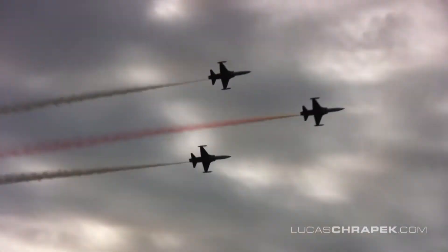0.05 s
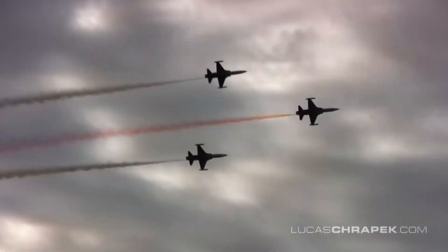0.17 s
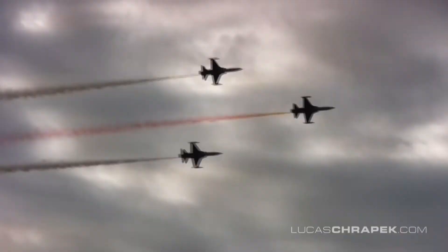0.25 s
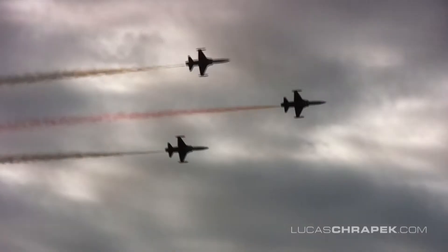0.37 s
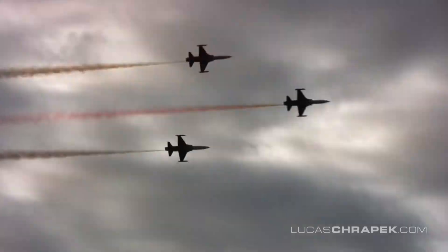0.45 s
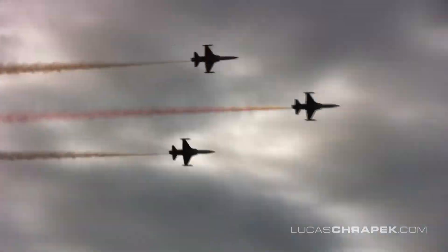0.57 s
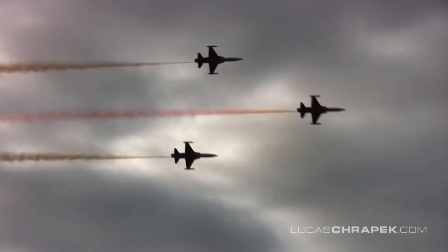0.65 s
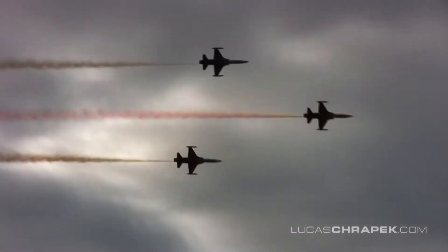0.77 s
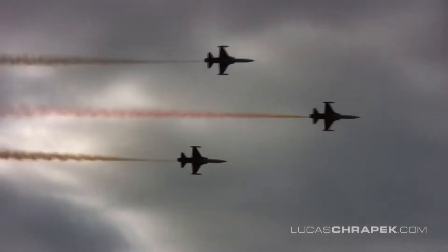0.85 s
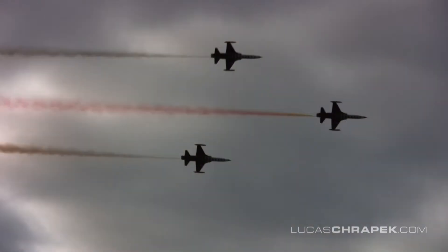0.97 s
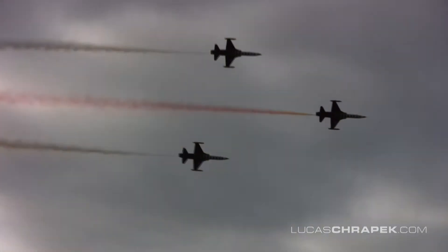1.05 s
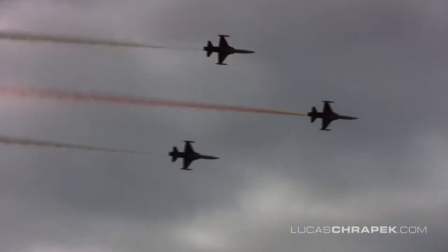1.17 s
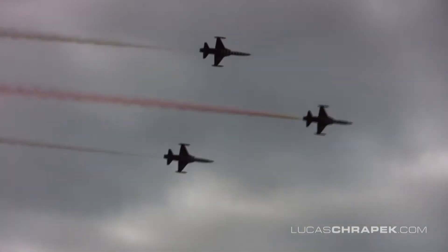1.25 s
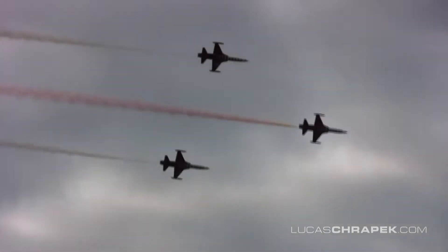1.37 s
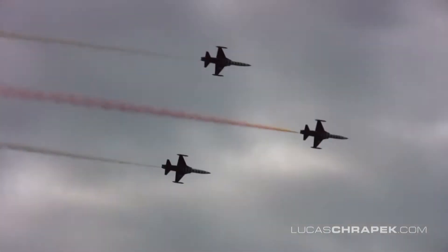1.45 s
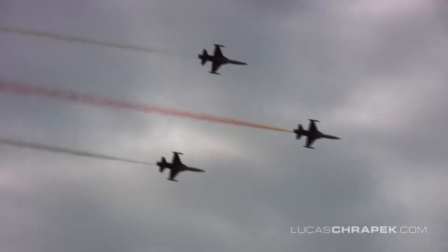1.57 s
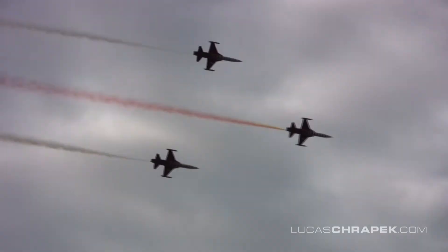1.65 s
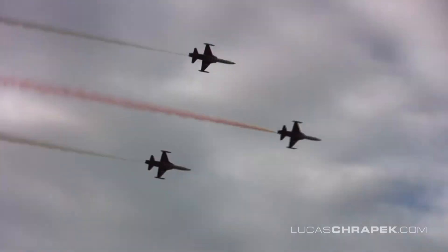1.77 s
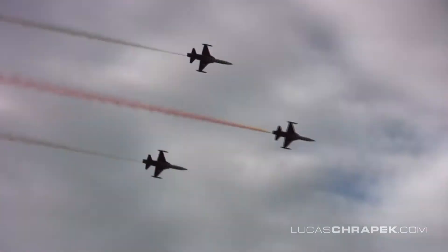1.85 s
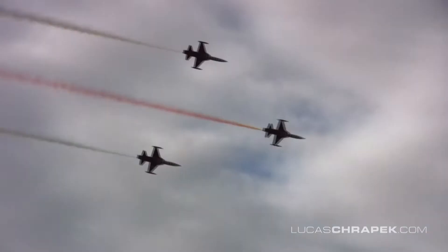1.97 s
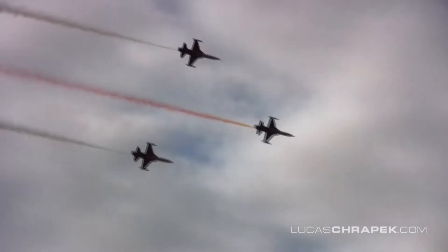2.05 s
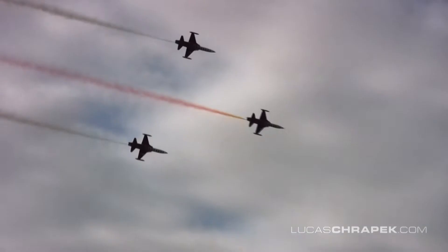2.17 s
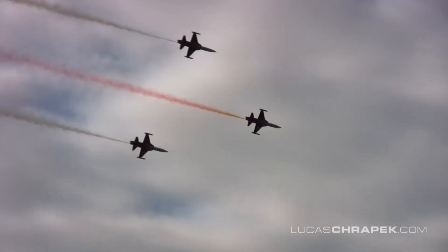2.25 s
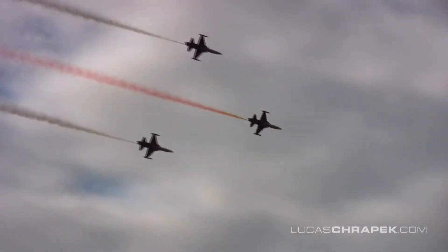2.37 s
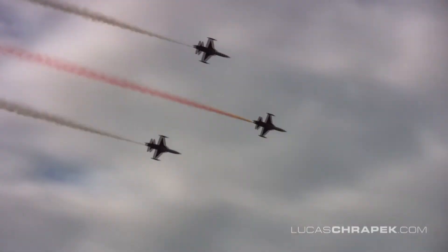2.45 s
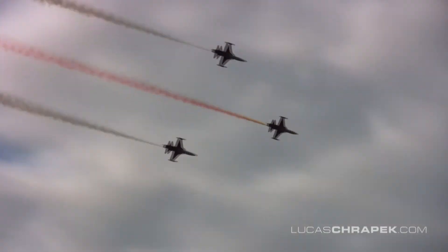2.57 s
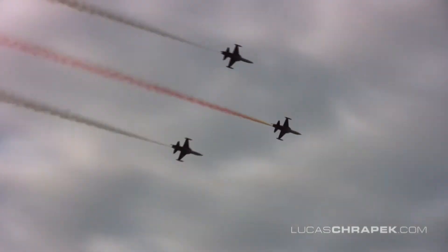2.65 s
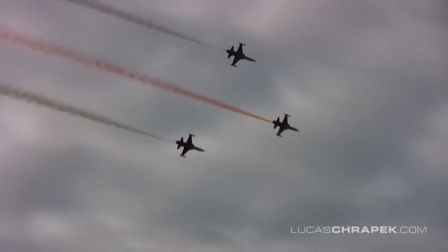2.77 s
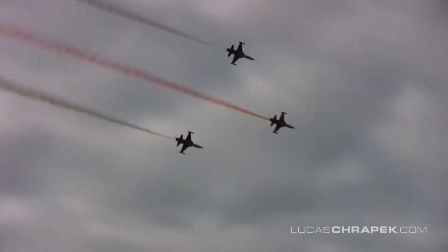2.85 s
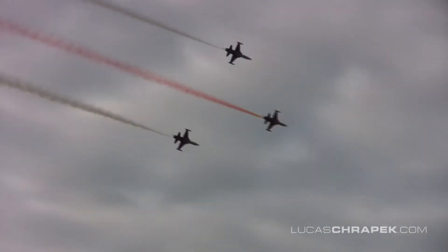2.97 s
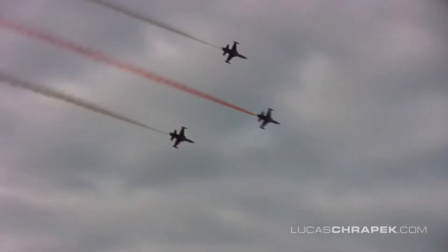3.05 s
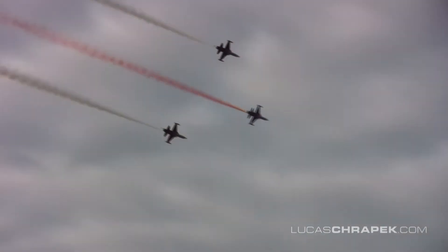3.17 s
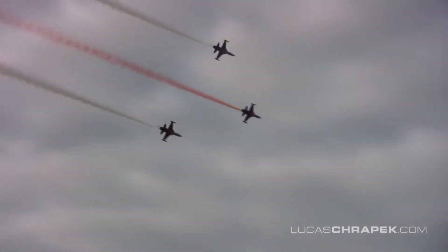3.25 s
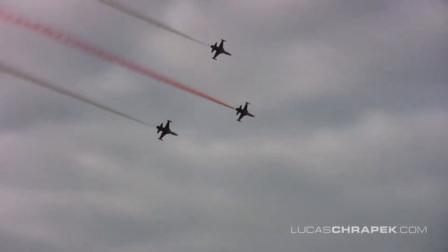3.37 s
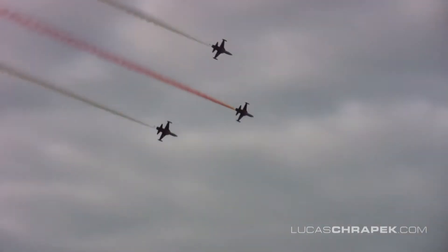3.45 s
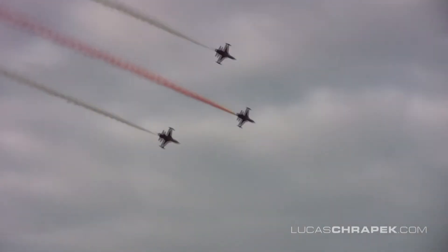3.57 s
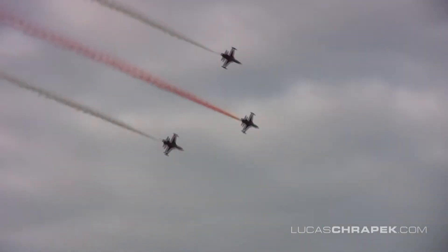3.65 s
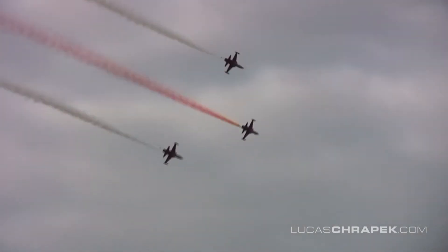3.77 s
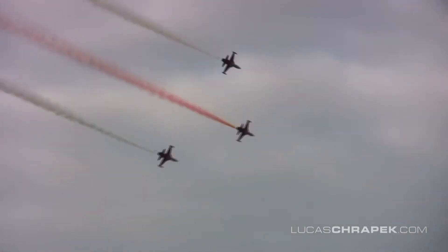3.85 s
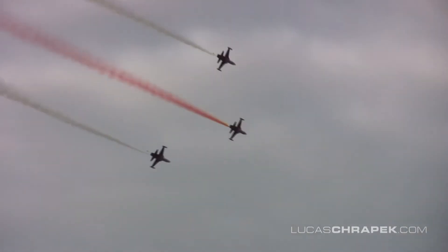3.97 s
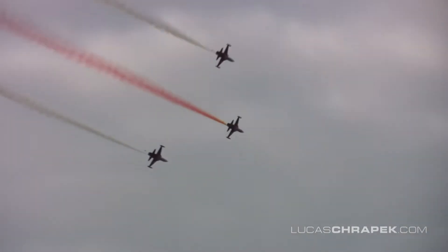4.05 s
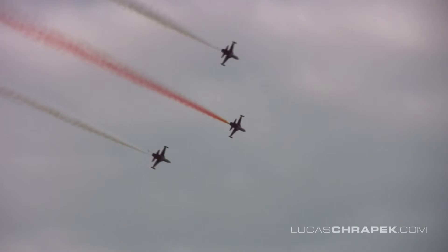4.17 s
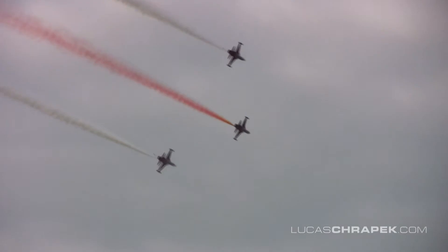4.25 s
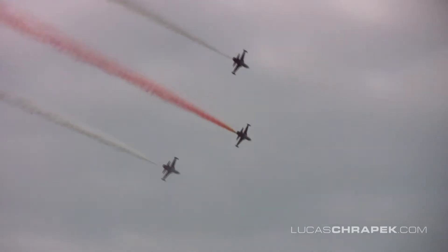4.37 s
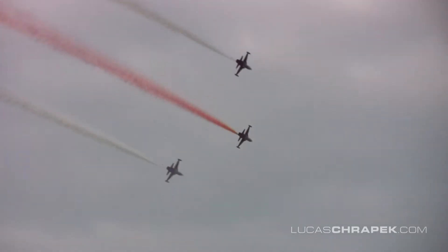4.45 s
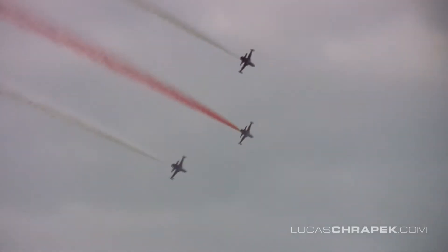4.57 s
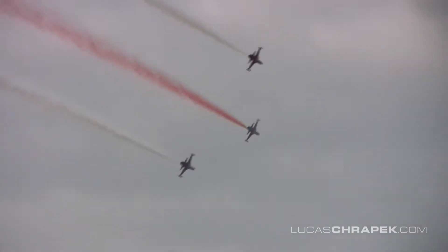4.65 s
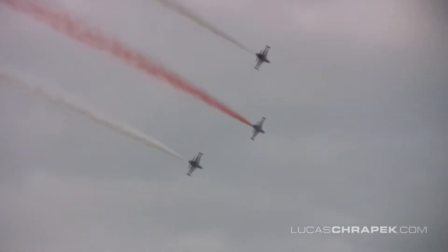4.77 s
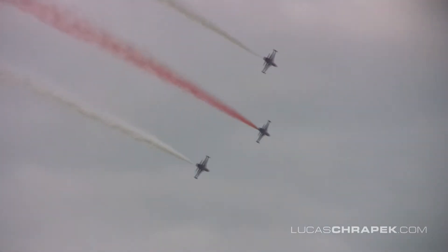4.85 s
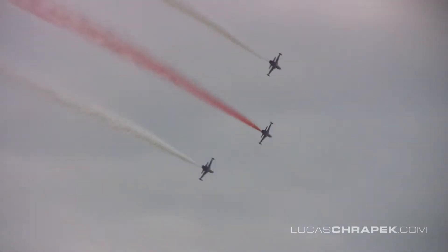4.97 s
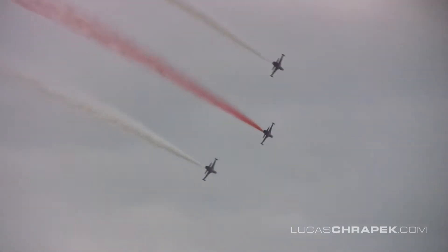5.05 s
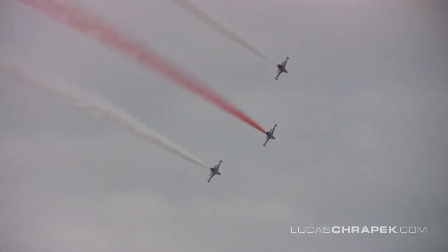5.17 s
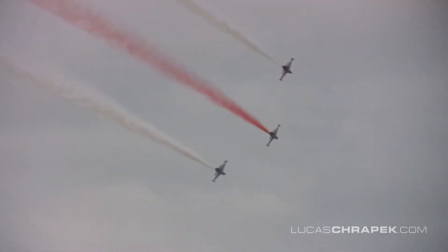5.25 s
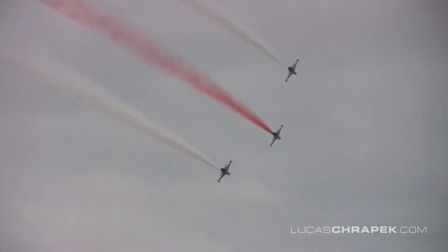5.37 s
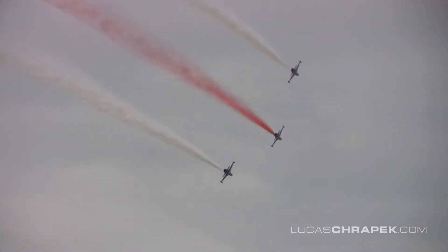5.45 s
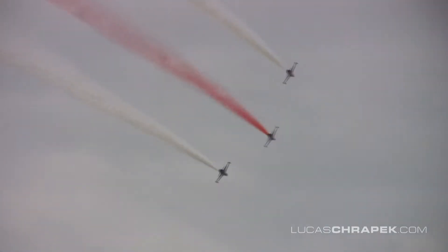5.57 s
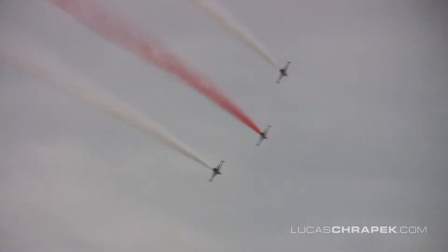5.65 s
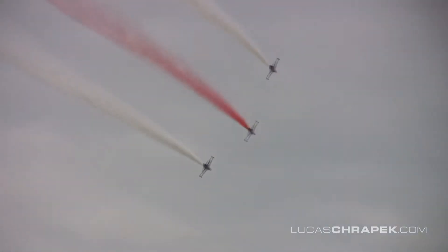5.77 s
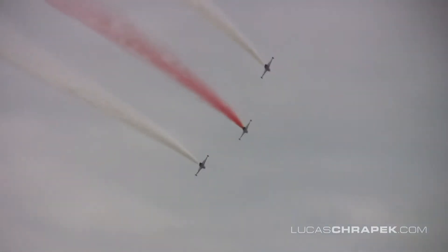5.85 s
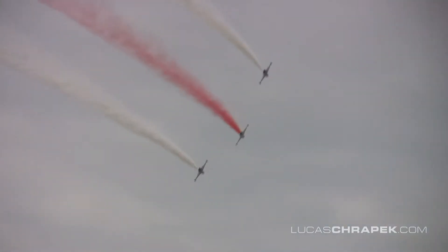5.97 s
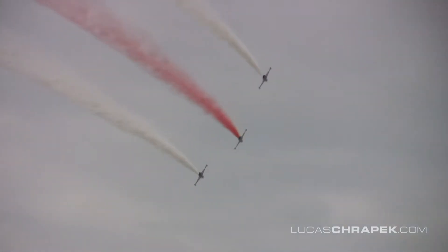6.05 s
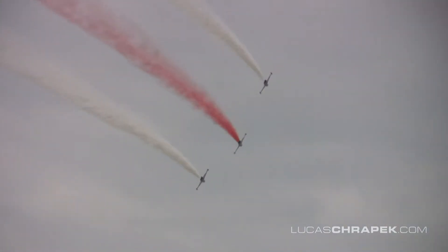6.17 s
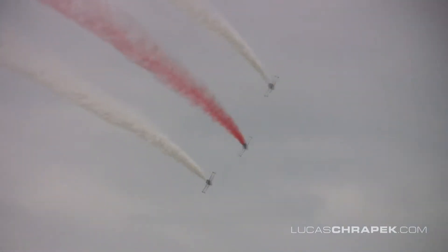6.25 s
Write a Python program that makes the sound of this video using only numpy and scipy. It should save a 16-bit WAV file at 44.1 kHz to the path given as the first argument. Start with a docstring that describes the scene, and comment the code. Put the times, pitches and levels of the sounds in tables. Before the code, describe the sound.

Open airfield, outdoor stereo microphone, three jets blending into one broad noise. At 0 s the exhaust is muffled and fairly quiet, with uneven surges around 0.3 and 0.55 s. By 1 s it brightens into a tearing rasp, with brief narrow whooshes sliding down in pitch. From 1.5 to 2.5 s it surges quickly and fine crackle builds, with tight spitting bursts, a sharp one near 1.8 s. A ground echo sweeps a hollow, phasing colour through it. Around 3 to 4.5 s the deep rear roar is fullest, rough and tearing, with a small lone crack at 3.9 s and a stronger one at 4.5 s. Low wind flutter begins near 2.4 s and continues lightly. After 4.5 s crackle and rasp thin out; the roar becomes darker and rumbly, fading in waves but still present at 6.3 s.

```python
"""Three jet fighters pass overhead in formation and climb away, heard from an open airfield.
Ahead of the nozzles the exhaust rasps; behind them it swells to a deep roar, and its shock fronts crackle.
Noise is coloured by flight path, narrow bands flare and slide down, and random fronts make the crackle.
A ground echo sweeps a comb through roar, rasp and crackle, turbulent air makes them surge,
and a breeze, built from low fluttering noise, catches the microphone."""
import sys
import numpy as np
from scipy import signal
from scipy.fft import rfft, irfft, next_fast_len
from scipy.io import wavfile
from scipy.ndimage import uniform_filter1d, map_coordinates

SR = 44100
rng = np.random.default_rng(int(sys.argv[2]) if len(sys.argv) > 2 else 0)


def waveform_to_disk(signal):
    """Save audio, clipped to [-1, 1], as 16-bit WAV at the path in sys.argv[1]."""
    frames = np.transpose(np.atleast_2d(signal))
    scaled = np.clip(frames, -1, 1) * 32767
    samples = np.round(scaled).astype(np.int16)
    wavfile.write(sys.argv[1], SR, samples)


N = 278182

# Flight path. Each row: time in seconds, middle ground-echo delay in ms, aft share 0-1,
# air loss in dB at 4 kHz, pitch factor.
FLIGHT_PATH = [(0, 2.22, 0.18, 25.5, 0.83), (.55, 2.4, 0.28, 9, 0.94), (.95, 2.28, 0.25, 2, 0.98),
               (1.5, 2.74, 0.39, 6, 1.028), (2.0, 3.5, 0.41, 3, 0.98), (2.5, 4.1, 0.47, 4, 1.082),
               (3.1, 4.03, 0.73, 3.5, 1.057), (4.0, 3.9, 0.87, 4.5, 1), (6.3, 3.1, 1, 6, 0.93)]
# Surges and lulls from moving air. Each row: centre in seconds, length in seconds,
# roar change in dB, rasp change in dB.
AIR_SURGES = [(0.15, 0.091, -5, 1), (0.341, 0.17, 4.5, 6.5), (0.565, 0.15, 6.5, 3.5),
              (0.725, 0.14, -1.5, -6.5), (0.814, 0.035, 0, 2), (0.97, 0.043, 1, -3.5),
              (1.04, 0.076, 2.3, 2.4), (1.237, 0.042, -1, -5), (1.302, 0.06, 1.9, 5),
              (1.381, 0.028, 1, 7.5), (1.474, 0.061, -1.5, 7), (1.579, 0.033, -5, 5.5),
              (1.814, 0.021, 7, 6.5), (1.857, 0.03, -0.5, -2.5), (2.073, 0.11, 4.5, 6),
              (2.161, 0.022, 3.5, 5.5), (2.231, 0.087, 4.5, 2.5), (2.333, 0.03, 4.5, 7),
              (2.406, 0.05, 2, 7), (2.475, 0.024, 1.5, -2), (2.5, 0.026, 0.5, 4.5), (2.633, 0.03, 2, 2.5),
              (2.682, 0.04, 2, 2.5), (2.899, 0.031, -3, 6), (3.02, 0.091, 1, 5), (3.133, 0.056, 0.5, 9.5),
              (3.222, 0.067, 2.5, 5), (3.367, 0.144, -3.5, -0.5), (3.585, 0.084, 0, 5),
              (3.74, 0.15, 2.5, 2), (3.83, 0.086, 2, 6.5), (3.975, 0.13, 3, 4), (4.185, 0.12, -0.5, 6),
              (4.352, 0.11, 3.5, 2.5), (4.456, 0.033, 4, 3), (4.521, 0.11, 4, 8.5), (4.661, 0.17, 0, 4.5),
              (4.742, 0.018, 1, -6.5), (4.94, 0.061, -2.5, -2.5), (5.058, 0.033, -1, 4.5),
              (5.151, 0.042, -1.8, 6), (5.256, 0.076, 0, 5), (5.339, 0.049, 6.5, 1), (5.408, 0.065, 6, 6),
              (5.65, 0.062, -0.5, -2.5), (5.78, 0.066, 5.5, 7.5), (6.098, 0.06, -2, 3.5)]
# Slow level of each noise. Each holds: level in dB before the slopes, rise end in seconds,
# fall start in seconds, rise in dB/s, fall in dB/s.
ROAR_SWELL = (-24, 4.5, 4, 5, 3)
RASP_SWELL = (-32, 2, 3, 6.5, 2.5)
CRACKLE_SWELL = (-60.5, 1.65, 3.5, 23.5, 6.5)
# Turbulent mixing from ahead and from behind. Each row: frequency in Hz, relative level in dB per Hz.
ROAR_AHEAD_SPECTRUM = [(20, -49), (55, -22), (105, -9), (190, -14.5), (270, -1.5), (380, 0), (650, -2),
                       (860, -6.5), (1300, -12.5), (4000, -74)]
ROAR_AFT_SPECTRUM = [(20, -53.5), (70, -22.5), (120, -20.5), (160, -2), (230, 0), (300, 4), (400, -3.5),
                     (560, -2), (700, -3), (950, -14.5), (1400, -15.5), (4000, -71)]
# Shock-cell noise from ahead and from behind. Each row: frequency in Hz, relative level in dB per Hz.
RASP_AHEAD_SPECTRUM = [(250, -41.5), (500, -17), (900, -9.5), (1250, -9.5), (1600, 3.5), (2050, 1),
                       (2400, -7), (2700, -20.5), (3100, -17.5), (3700, -13), (4300, -41), (5000, -33.5),
                       (8000, -76)]
RASP_AFT_SPECTRUM = [(250, -31.5), (450, -1), (850, 0.5), (1200, -3), (1600, -2), (1950, -5.5), (2350, -12),
                     (3050, -8), (3600, -22), (4050, -21), (4800, -29.5), (8000, -59.5)]
# Narrow bands that flare. Each row: centre in seconds, length in seconds, frequency in Hz at the centre,
# level in dB.
FLARES = [(.25, 0.93, 631, -47), (.38, 0.11, 1490, -46), (.52, .15, 409, -40.5), (0.545, 0.12, 1578, -38),
          (1.061, 0.073, 1265, -35), (1.13, 0.31, 370.8, -41.5), (1.5, 0.29, 350, -37.5),
          (1.796, 0.044, 1523, -33), (3.87, 0.36, 509.3, -28.5), (4.389, 0.087, 529, -26.5)]
# Trains of small fronts, then steep ones. Each row: frequency in Hz, relative level in dB per Hz.
CRACKLE_SPECTRUM = [(600, -26), (3300, 3.5), (4050, -5), (4650, -1), (7000, -10.5), (10000, -18.5),
                    (15500, -49.5)]
SNAP_SPECTRUM = [(400, -13.5), (1800, 14.5), (3500, 8.5), (5500, 4.5), (10000, -3), (12000, -11),
                 (15500, -17.5)]
# Tight clusters of steep shock fronts. Each row: centre in seconds, length in seconds, level in dB.
SHOCK_BURSTS = [(.83, .035, -70.5), (1.338, .025, -60), (1.385, .01, -55), (1.487, .025, -52.5),
                (1.814, 0.0071, -39), (1.936, 0.019, -49.5), (2.023, .015, -46.5), (2.037, 0.009, -40),
                (2.16, 0.027, -52.5), (2.224, 0.022, -48.5), (2.317, .01, -48.5), (2.397, .014, -46),
                (2.434, .018, -47), (2.62, 0.0098, -43), (2.681, .025, -54), (2.911, 0.013, -47.5),
                (2.967, 0.027, -49.5), (3.121, 0.03, -48), (3.156, 0.018, -47), (3.21, .02, -51.5),
                (3.262, 0.02, -48), (3.959, 0.016, -48.5), (4.086, 0.046, -53.5), (4.176, .012, -44.5),
                (4.47, .03, -53), (4.523, .025, -49.5), (4.8, .03, -62), (4.886, 0.046, -61.5),
                (5.492, .025, -64), (5.589, .06, -64.5), (5.788, 0.045, -62), (6.122, .025, -70)]
# Wind on the ports. Each row: frequency in Hz, relative level in dB per Hz.
BUFFET_SPECTRUM = [(20, -35.5), (55, -13.5), (85, 5.5), (155, 1), (300, -7), (3000, -71.5)]
# Gusts on the microphone. Each row: centre in seconds, length in seconds, level in dB.
WIND_GUSTS = [(2.427, 0.39, -39), (4.352, 0.45, -44.5), (4.836, 0.19, -41), (5.494, 0.16, -45.5)]
# Lone steepened fronts. Each row: time in seconds, pressure scale in dB before the left-right tilt,
# rise constant in microseconds.
LONE_CRACKS = [(3.862, -20.5, 27), (4.5222, -11.5, 52)]
# Left-right likeness of the jets. Each row: frequency in Hz, likeness from -1 to 1.
PORT_LIKENESS = [(300, 1), (2800, 0.98), (4200, 0.75)]

FLARE_WIDTH_HZ, FLARE_SINK_OCT_PER_S = 116, .5
CRACKLE_DB_PER_RASP_DB = 0.88
CRACK_RELAX_S = .0004
CALM_DB, BREEZE_DB, BREEZE_FROM_S = -70.5, -47, 2.8
TOP_HZ = 15700
FRAME, OVERLAP = 1024, 768  # samples
HZ = np.fft.rfftfreq(FRAME, 1 / SR)[:, None]
TIME_S = np.arange(N) / SR


def amp(db):
    """Decibels to amplitude."""
    return 10 ** (np.asarray(db) / 20)


def unit(x):
    """Scale to rms 1."""
    return x / np.sqrt(np.mean(x ** 2) + 1e-20)


def along(points, hz):
    """Interpolate (Hz, value) points on a log frequency axis."""
    point_hz, values = np.transpose(points)
    return np.interp(np.log(hz + 1), np.log(point_hz + 1), values)


def curves(rows, s=TIME_S):
    """Each column after the time, at times s or at every sample."""
    knots_s, *columns = np.transpose(rows)
    return [np.interp(s, knots_s, column) for column in columns]


def wobble(knots_per_s):
    """A smooth random curve."""
    knots = rng.standard_normal(int(N * knots_per_s / SR) + 4)
    return map_coordinates(knots, [TIME_S * knots_per_s])


def delayed(x, ms):
    """One channel, late by a changing time."""
    return map_coordinates(x, [np.arange(N) - ms * SR / 1000], order=3)


def hump(centre_s, length_s):
    """A bell, above half its height for the given length."""
    return .5 ** ((2 * (TIME_S - centre_s) / length_s) ** 2)


def passing(level_db, rise_end_s, fall_start_s, rise_db_per_s, fall_db_per_s):
    """Level in dB: one slope up until the rise ends, one down from the fall's start."""
    rise_db = rise_db_per_s * np.maximum(rise_end_s - TIME_S, 0)
    fall_db = fall_db_per_s * np.maximum(TIME_S - fall_start_s, 0)
    return level_db - rise_db - fall_db


def coloured(pair, colour, likeness, lo_hz, hi_hz, patchy_db):
    """Colour mid and side noise by colour(s) in dB, levelled over the band lo-hi, and make left and right."""
    _, s, z = signal.stft(pair, SR, nperseg=FRAME, noverlap=OVERLAP)
    gain = amp(colour(s))
    in_band = (HZ > lo_hz) & (HZ < hi_hz)
    gain = gain / np.sqrt(np.mean(gain ** 2 * in_band, axis=0))
    # random patches of level, smooth across frequency and time
    patches = uniform_filter1d(rng.standard_normal(z.shape[1:]), size=8, axis=0)
    patches = uniform_filter1d(patches, size=14, axis=1)
    # half-angle that splits power between mid and side
    turn = np.arccos(np.clip(likeness, -1, 1) * np.ones_like(HZ)) / 2
    z = z * gain * amp(patchy_db * unit(patches)) * np.array([np.cos(turn), np.sin(turn)])
    mid, side = signal.istft(z, SR, nperseg=FRAME, noverlap=OVERLAP)[1][:, :N]
    return np.array([mid + side, mid - side])


def radiated(ahead, behind, shifted=True):
    """The colour that reaches the ground: turned from nose to tail, pitch-shifted by motion, dulled by air."""
    def colour(s):
        _, aft, loss_db, pitch = curves(FLIGHT_PATH, s)
        hz = HZ / pitch if shifted else HZ
        source_db = (1 - aft) * along(ahead, hz) + aft * along(behind, hz)
        return source_db - np.maximum(loss_db, 0) * (HZ / 4000) ** 1.74
    return colour


def grounded(x, strength):
    """Direct sound plus ground echo; each jet has its own delay, which blurs the higher notches."""
    late_ms = curves(FLIGHT_PATH)[0]
    echoes = [[delayed(channel, late_ms * (1 + 0.079 * jet)) for channel in x] for jet in (-1, 0, 1)]
    echo = np.mean(echoes, axis=0)
    return np.std(x) * unit(x + strength * echo)


def fronts(per_s, spread_db):
    """Shock fronts at random moments and of uneven size, as mid and side."""
    struck = rng.random(N) < per_s / SR
    sizes = amp(spread_db * np.minimum(rng.standard_normal(N), 2.3))
    return unit(struck * sizes * np.array([np.ones(N), rng.standard_normal(N)]))


def surges():
    """Moving air focuses sound into surges or bends it away in lulls: dB added to roar and rasp."""
    return sum(np.outer([roar_db, rasp_db], hump(s, length_s))
               for s, length_s, roar_db, rasp_db in AIR_SURGES)


def roar(surge_db, flicker):
    """Large eddies mix in the plumes: the deep noise grows as the nozzles turn to the listener."""
    eddies = grounded(rng.standard_normal((2, N)), strength=0.52)
    mixing = radiated(ROAR_AHEAD_SPECTRUM, ROAR_AFT_SPECTRUM, shifted=False)

    def colour(s):
        # as the jets recede, the lowest rumble grows against the rest
        rumble_db = np.interp(s, [3.5, 6], [-1.5, 3.5])
        return mixing(s) + rumble_db / (1 + (HZ / 110) ** 6)

    body = coloured(eddies, colour, along(PORT_LIKENESS, HZ), 150, 900, patchy_db=1.15)
    return amp(passing(*ROAR_SWELL) + surge_db + 0.099 * flicker) * body


def rasp(surge_db, flicker):
    """Dense small shocks and fine turbulence make a tearing noise."""
    turbulence = 1.53 * rng.standard_normal((2, N))
    tearing = grounded(unit(fronts(per_s=1500, spread_db=1) + turbulence), strength=0.28)
    colour = radiated(RASP_AHEAD_SPECTRUM, RASP_AFT_SPECTRUM)
    body = coloured(tearing, colour, along(PORT_LIKENESS, HZ), 940, 2500, patchy_db=1.66)
    return amp(passing(*RASP_SWELL) + surge_db + 1.48 * flicker) * body


def whooshes(flicker):
    """Narrow bands of exhaust noise flare, each sliding down as the jets go by."""
    smooth = signal.butter(2, FLARE_WIDTH_HZ / 2, fs=SR, output="sos")
    bands = np.zeros(N)
    for s, length_s, centre_hz, db in FLARES:
        hz = centre_hz * 2 ** (-FLARE_SINK_OCT_PER_S * (TIME_S - s))
        phase = 2 * np.pi * np.cumsum(hz) / SR
        a, b = signal.sosfilt(smooth, rng.standard_normal((2, N)))
        band = unit(a * np.cos(phase) + b * np.sin(phase))
        bands += amp(db) * hump(s, length_s) * band
    return bands * amp(flicker)


def crackle(rasp_surge_db, flicker):
    """Steepened fronts of very uneven size, mixed with noise, swell and surge."""
    clumps = unit(fronts(per_s=600, spread_db=4.0) + 1.1 * rng.standard_normal((2, N)))
    level_db = passing(*CRACKLE_SWELL) + CRACKLE_DB_PER_RASP_DB * rasp_surge_db + 2 * flicker
    train = grounded(amp(level_db) * clumps, strength=0.45)
    colour = radiated(CRACKLE_SPECTRUM, CRACKLE_SPECTRUM)
    return coloured(train, colour, along(PORT_LIKENESS, HZ), 4240, 11000, patchy_db=0.3)


def snaps():
    """Each burst is a dense cluster of steep fronts that swells and dies within hundredths of a second."""
    strength = sum(amp(db) * hump(s, length_s) for s, length_s, db in SHOCK_BURSTS)
    train = strength * unit(fronts(per_s=1900, spread_db=3.6) + .5 * rng.standard_normal((2, N)))
    colour = radiated(SNAP_SPECTRUM, SNAP_SPECTRUM)
    return coloured(grounded(train, strength=0.32), colour, along(PORT_LIKENESS, HZ), 3580, 11000,
                    patchy_db=1.5)


def breeze():
    """Gusts flutter on the microphone and push its two channels largely opposite ways."""
    def colour(s):
        return along(BUFFET_SPECTRUM, HZ)

    flutter = coloured(rng.standard_normal((2, N)), colour, -0.86, 25, 350, patchy_db=-1.5)
    steady_db = np.interp(TIME_S, [BREEZE_FROM_S - .2, BREEZE_FROM_S], [CALM_DB, BREEZE_DB])
    gusts = sum(amp(db) * hump(s, length_s) for s, length_s, db in WIND_GUSTS)
    return (amp(steady_db) + gusts) * amp(1.5 * wobble(28)) * flutter


def cracks():
    """A lone front: the pressure jumps, then sinks back through zero."""
    wave = np.zeros(N)
    for s, db, rise_us in LONE_CRACKS:
        since_s = TIME_S - s
        u = np.maximum(since_s, 0) / CRACK_RELAX_S
        edge = (1 + np.tanh(since_s * 1e6 / rise_us)) / 2
        wave += amp(db) * edge * (1 - u) * np.exp(-u)
    return wave


def jets():
    """Turbulent air makes roar, rasp and crackle surge together; the sound reaches the left port first."""
    roar_db, rasp_db = surges()
    flicker = 0.59 * wobble(40) + 0.65 * wobble(85)
    exhaust = roar(roar_db, flicker) + rasp(rasp_db, flicker) + whooshes(flicker)
    sharp = crackle(rasp_db, flicker) + snaps() + cracks()
    left, right = exhaust + sharp * amp([[1], [-1]])  # left-right tilt in dB
    aft = curves(FLIGHT_PATH)[1]
    pan = amp(0.25 - 0.47 * aft)
    return np.array([left * pan, delayed(right, ms=.05 - 0.044 * aft) / pan])


def scene():
    """Jets, breeze and the microphone's own hiss."""
    hiss = amp(-87.5) * rng.standard_normal((2, N))
    return jets() + breeze() + hiss


def record(dry):
    """The microphone sheds the deepest bass, and nothing is kept above its band limit."""
    m = next_fast_len(N + SR // 2)
    hz = np.fft.rfftfreq(m, 1 / SR)
    low_cut_hz = 42
    response = hz ** 2 / np.hypot(hz ** 2, low_cut_hz ** 2) * (hz < TOP_HZ)
    return irfft(rfft(dry, m) * response, m)[:, :N]


dry = scene()
out = record(dry)
waveform_to_disk(out)
```